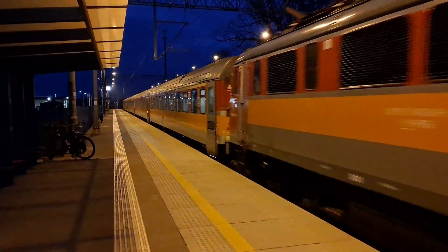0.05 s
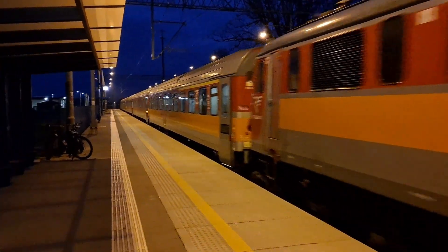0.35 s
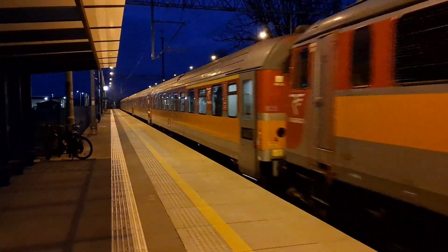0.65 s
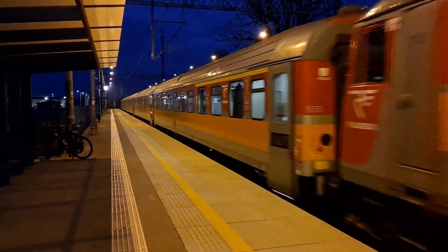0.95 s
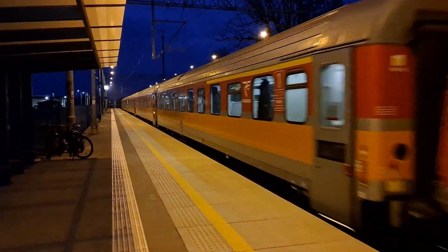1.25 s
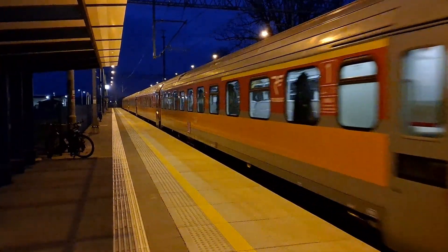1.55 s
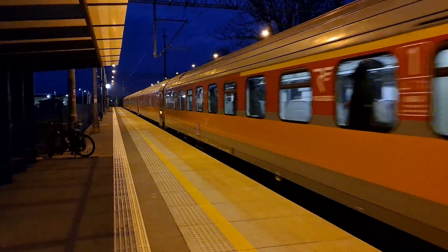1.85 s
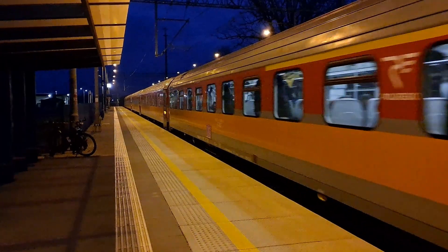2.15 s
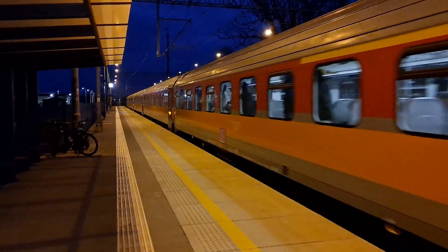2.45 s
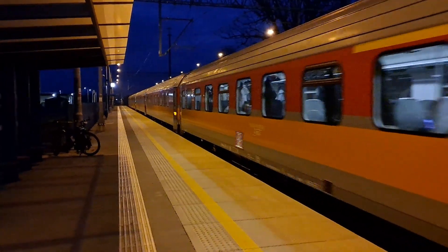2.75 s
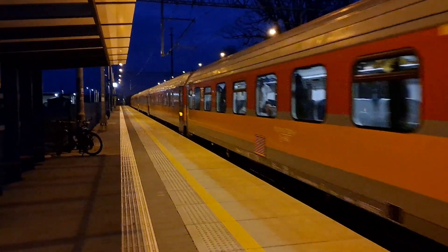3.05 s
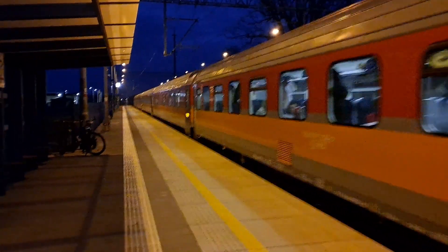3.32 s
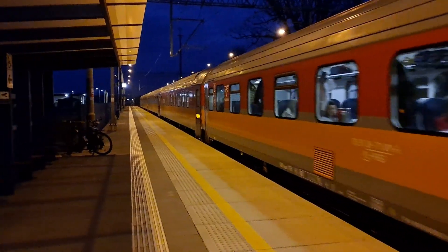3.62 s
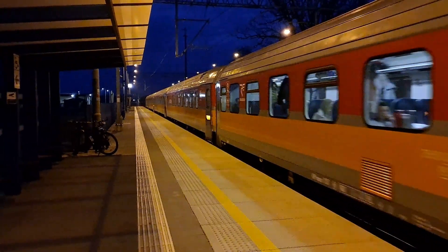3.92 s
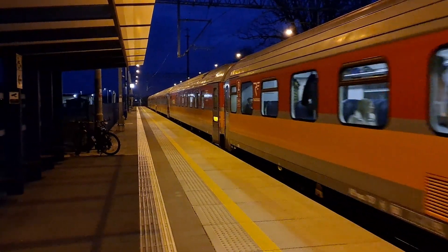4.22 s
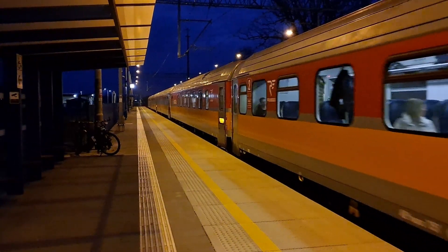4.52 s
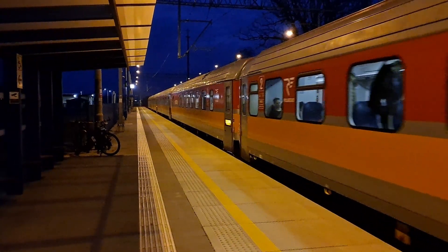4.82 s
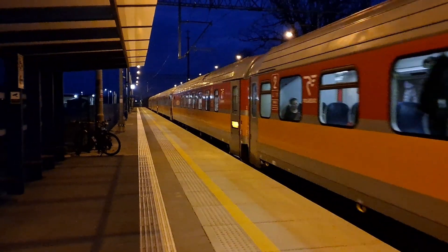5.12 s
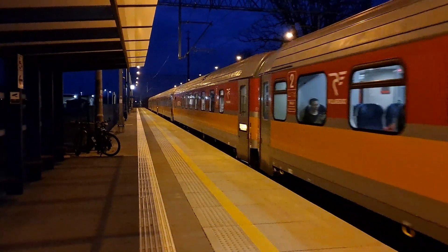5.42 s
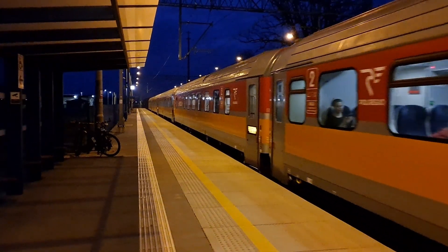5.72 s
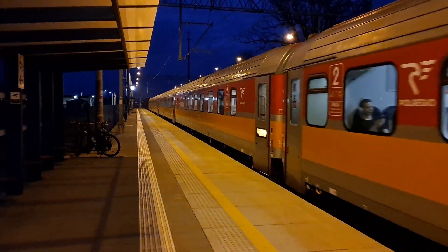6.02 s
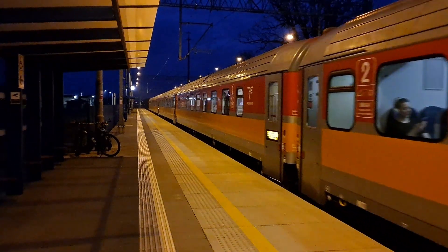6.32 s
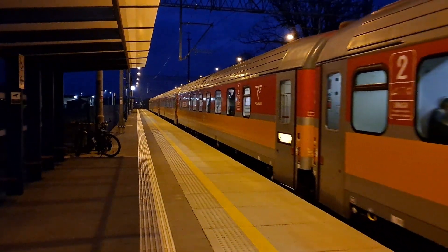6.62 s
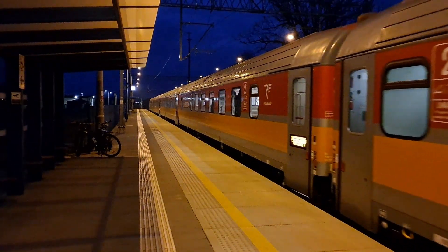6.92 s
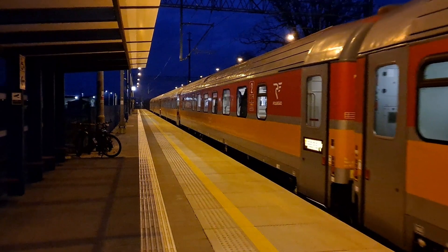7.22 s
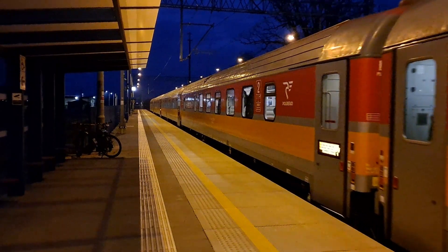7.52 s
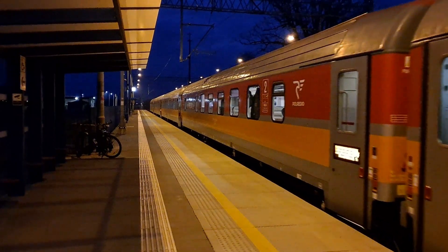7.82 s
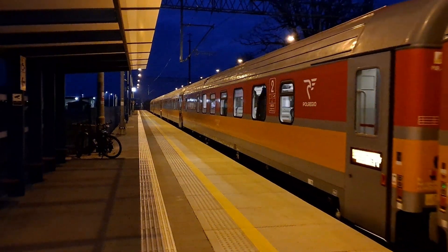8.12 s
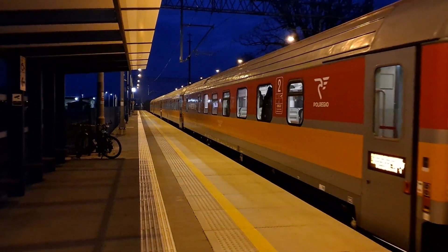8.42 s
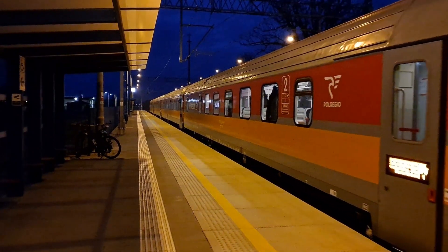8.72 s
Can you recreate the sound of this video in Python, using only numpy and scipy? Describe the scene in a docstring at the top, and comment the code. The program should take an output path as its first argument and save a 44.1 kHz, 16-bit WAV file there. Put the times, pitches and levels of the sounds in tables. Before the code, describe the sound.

An electric passenger train slows along a station platform, heard in stereo from a few metres away. The locomotive's hum and heavy rumble recede in the first seconds, while a loud, piercing brake squeal swells and dips slightly in pitch. Brief wheel scuffs and squeaks dot the coaches' softer rolling. A thinner whine joins, and the squeal pulses, then dies away near the end.

```python
"""Train braking at a platform

A passenger train slows a few metres away. The electric locomotive hums and recedes; the coaches
rumble after it. Their brake discs squeal near 4.7 kHz by stick-slip, sink in pitch as they pass
(Doppler) and pulse as the pads bite. Wheels scuff and ping, the running gear squeaks, a thinner
whine joins from a second brake, and the squeal dies away as the train loses speed."""
import sys
import numpy as np
from scipy import signal
from scipy.fft import rfft, irfft, next_fast_len
from scipy.io import wavfile
from scipy.ndimage import uniform_filter1d, minimum_filter1d

SR = 44100
rng = np.random.default_rng(int(sys.argv[2]) if len(sys.argv) > 2 else 0)


def generate_wav(sig):
    """Save sig (samples, or channels by samples) to the path in sys.argv[1] as 16-bit PCM at SR."""
    pcm = np.round(np.clip(np.atleast_2d(sig).T, -1, 1) * 32767).astype(np.int16)
    wavfile.write(sys.argv[1], SR, pcm)


N = 390716
TIME = np.arange(N) / SR
ENTRY_M_PER_S, BRAKING_M_PER_S2 = 6.3, .5

# stereo balance of sound from the track: f/Hz, left-right/dB
BALANCE_DB = [(30, 2.7), (300, 3.6), (1500, 2.4), (3500, 0.74), (5800, 3), (7500, 10), (9400, 23),
              (11000, 37), (13000, 4), (15500, 5)]


def from_db(db):
    """Decibels to gain."""
    return 10 ** (np.asarray(db) / 20)


def rms_one(x):
    """Scale to unit power."""
    return x / np.sqrt(np.mean(np.abs(x) ** 2) + 1e-20)


def in_time(rows):
    """Each column of a time curve at every sample."""
    times_s, *columns = np.transpose(rows)
    return [np.interp(TIME, times_s, column) for column in columns]


def at_hz(points, hz):
    """Read a spectrum on a log-frequency axis."""
    points_hz, values = np.transpose(points)
    return np.interp(np.log(np.maximum(hz, 1)), np.log(points_hz), values)


def panned(side_db):
    """Left and right gains for a level difference."""
    return from_db(np.array([[.5], [-.5]]) * side_db)


def drift(rate_hz):
    """Low-passed random wander, unit RMS."""
    step = 16
    pole = np.exp(-2 * np.pi * rate_hz * step / SR)
    white = rng.standard_normal(N // step + 2002)
    slow = signal.lfilter([1], [1, -2 * pole, pole * pole], white)[2000:]
    slow = rms_one(slow).astype(np.float32)
    between = np.arange(step, dtype=np.float32) / step
    return (slow[:-1, None] + np.diff(slow)[:, None] * between).ravel()[:N]


def phase_of(hz):
    """Running phase of a steady or moving pitch."""
    return 2 * np.pi * np.cumsum(hz + np.zeros(N)) / SR


def scattered(phase, width_hz, channels=2):
    """Tone over many shifting paths: random fading, independent per channel."""
    angle = (phase % (2 * np.pi)).astype(np.float32)
    cos, sin = np.cos(angle), np.sin(angle)
    return np.array([drift(width_hz) * cos + drift(width_hz) * sin for _ in range(channels)])


def steadied(pair, span_s):
    """Even out each channel's mean power; fast beating remains."""
    size = max(int(span_s * SR), 2)
    power = uniform_filter1d(uniform_filter1d(pair ** 2, size), size // 2)
    return pair / np.sqrt(np.maximum(power, 1e-6))


def swell(centre_s, length_s):
    """Gaussian rise and fall, peak 1."""
    out = np.zeros(N)
    near = slice(*np.searchsorted(TIME, [centre_s - 2 * length_s, centre_s + 2 * length_s]))
    out[near] = np.exp(-2 * ((TIME[near] - centre_s) / length_s) ** 2)
    return out


def track_noise(layers, left_lag_s=0.000363):
    """Stereo noise in layers of (gain, spectral shape); the common part arrives on the right first."""
    # left-right likeness: f/Hz, common share of power
    likeness = [(30, .95), (280, .96), (500, 0.75), (900, 0.26), (1350, 0.51), (2500, 0.22), (6000, 0.38),
                (7500, 0)]
    size = next_fast_len(N)
    hz = np.fft.rfftfreq(size, 1 / SR)
    alike = np.clip(at_hz(likeness, hz), 0, .965)
    sides = panned(at_hz(BALANCE_DB, hz))
    sides = sides / np.sqrt(np.mean(sides ** 2, axis=0))
    lag = np.exp(-2j * np.pi * hz * left_lag_s * np.array([[1], [0]]))
    common = sides * np.sqrt(alike) * lag
    own = sides * np.sqrt(1 - alike)
    out = 0
    for gain, colour in layers:
        white = rfft(rng.standard_normal((3, size), dtype=np.float32))
        spectrum = (common * white[2] + own * white[:2]) * from_db(at_hz(colour, hz))
        out = out + gain * rms_one(irfft(spectrum.astype(np.complex64), size)[:, :N])
    return out


def rolling():
    """Wheels on rail shake the track bed, bogies and bodies; the brake pads hiss."""
    # rolling trends: t/s, deep thrum/dB, rumble/dB, bogie and body drone/dB, wheel-rail roar/dB
    rolling_trends = [(0, -39, -29, -29, -28), (.3, -36, -28, -28, -29), (.65, -45, -36, -30, -31.5),
                      (1.2, -46.5, -33, -28, -32.5), (2.05, -48.5, -37, -34, -38),
                      (2.9, -54, -39, -41, -44.5), (4.4, -58, -41.5, -48, -46.5),
                      (5.7, -61, -39, -44, -45.5), (6.8, -54, -37.5, -38.5, -42.5),
                      (7.7, -53, -38, -41.5, -43.5), (8.25, -48, -40, -41, -43),
                      (8.6, -44, -34, -40.5, -43.5), (8.86, -44, -38, -44, -43.5)]
    # pad hiss trend: t/s, level/dB
    hiss_trend = [(0, -37), (.3, -38.3), (.65, -43), (2.2, -41), (3.9, -42.5), (5.4, -47), (6.2, -45.5),
                  (7.75, -46), (8.86, -53)]
    # spectral shapes: f/Hz, relative density/dB
    thrum_colour = [(16, -36.5), (27, -9.5), (34, 5), (43, -1.5), (55, 0.5), (66, 0), (85, -12.5),
                    (200, -47)]
    rumble_colour = [(25, -35.5), (46, -16), (68, -2.5), (98, -0.5), (125, -4), (155, -7.5), (220, -17),
                     (500, -50.5)]
    drone_colour = [(90, -25), (165, -5.5), (200, 4), (260, -1.5), (330, -5), (430, -9), (600, -30.5),
                    (1500, -54)]
    roar_colour = [(250, -5), (480, 2), (780, 3), (1300, -2), (1750, 0.5), (2500, 0), (3300, -4),
                   (4300, -4.5), (6000, -14.5), (10000, -40)]
    hiss_colour = [(2000, -18), (3200, 2), (3600, 1.5), (3900, 8), (4500, 15), (5400, 4.5), (6400, 1.5),
                   (7600, 1), (8300, 3.5), (9700, -0.5), (10800, -15.5), (12800, -9), (15500, -10)]
    thrum_db, rumble_db, drone_db, roar_db = in_time(rolling_trends)
    hiss_db, = in_time(hiss_trend)
    return track_noise([(from_db(thrum_db + 4.0), thrum_colour),
                        (from_db(rumble_db - 0.87), rumble_colour),
                        (from_db(drone_db - 0.14), drone_colour),
                        (from_db(roar_db + 3.0), roar_colour),
                        (from_db(hiss_db + 8.0), hiss_colour)])


def locomotive():
    """Blower tones and gear noise, fading with distance."""
    # receding hum: t/s, level/dB
    recession = [(0, -28.5), (.5, -36.5), (.9, -32), (1.3, -38), (2, -43), (3, -51), (4.5, -55.5),
                 (8.86, -64)]
    # blowers and running gear: f/Hz, width/Hz, relative level/dB
    blowers = [(99.2, 9.2, -5.5), (130, 14, -2.5), (245.2, 8.8, -0.5), (320, 20, -7), (491, 5, -11.5),
               (871, 80, -12)]
    level_db, = in_time(recession)
    hum = sum(from_db(db) * scattered(phase_of(hz), width_hz, channels=1)
              for hz, width_hz, db in blowers)
    return from_db(level_db) * hum * panned(2.4)


def wheel_scuffs():
    """Short rasps set a wheel ringing; higher modes are damped more."""
    # scuffs: t/s, length/s, rasp/dB, ring/dB
    scuffs = [(3.145, 0.063, -36, -43), (3.76, 0.052, -37, -46), (4.193, .08, -52, -51),
              (4.43, 0.05, -38, -36), (4.80, 0.054, -41, -48), (5.2, 0.066, -42, -37.5),
              (5.606, .05, -44, -52), (6.08, 0.067, -55, -41), (7.40, 0.14, -50, -48),
              (7.785, 0.075, -44, -50)]
    # wheel resonances: f/Hz, relative level/dB
    wheel_modes = [(2015, -10.5), (2715, -1), (6730, -11), (7290, -14)]
    # rasp spectrum: f/Hz, relative density/dB
    rasp_colour = [(900, -24), (2200, -1.5), (4500, -4), (8000, -0.5), (15000, -19.5)]
    rasp_gain = sum(from_db(db) * swell(s, length_s) for s, length_s, db, _ in scuffs)
    ring_gain = sum(from_db(db) * swell(s, length_s) for s, length_s, _, db in scuffs)
    ring = 0
    for hz, db in wheel_modes:
        mode = steadied(scattered(phase_of(hz), width_hz=0.0097 * hz), span_s=.1)
        ring = ring + from_db(db) * mode * panned(at_hz(BALANCE_DB, hz))
    return track_noise([(rasp_gain, rasp_colour)]) + ring_gain * ring


def gear_squeaks():
    """Brief rubbing tones from the running gear, one at a time, each on its own pitch."""
    # squeaks: t/s, length/s, f/Hz, level/dB
    squeaks = [(2.83, 0.044, 5150, -26), (3.31, 0.036, 8260, -40), (4.325, .06, 3550, -43.5),
               (4.518, .05, 3570, -44), (4.78, 0.06, 3610, -40), (5.58, 0.079, 3600, -46),
               (6.83, 0.073, 8250, -49), (7.332, .04, 7600, -47), (8.2, 0.097, 8270, -46.5)]
    times_s, _, pitches_hz, _ = np.transpose(squeaks)
    nearest = np.searchsorted((times_s[:-1] + times_s[1:]) / 2, TIME)
    tone = steadied(scattered(phase_of(pitches_hz[nearest]), width_hz=60), span_s=.07)
    gain = sum(from_db(db) * swell(s, length_s) for s, length_s, _, db in squeaks)
    return gain * tone * panned(at_hz(BALANCE_DB, pitches_hz))[:, nearest]


def pad_beat(rate_hz=2.285, crest_s=6.47):
    """Steady bite and ease of the pads, -1 to 1."""
    return np.cos(2 * np.pi * rate_hz * (TIME - crest_s))


def thin_whine(pitch_hz=4411, onset_s=5.55, beat_depth_db=4.5):
    """A second brake sings a little lower, swelling with the beat of the pads."""
    # whine trend: t/s, level/dB
    trend = [(5.6, -45), (6.25, -40.5), (6.85, -36.5), (7.1, -53), (7.4, -51), (7.78, -40.5), (8.15, -54),
             (8.86, -68)]
    trend_db, = in_time(trend)
    fade_in = np.clip((TIME - onset_s) / 0.28, 0, 1)
    gain = fade_in * from_db(trend_db + beat_depth_db * pad_beat() + 7.0)
    tone = scattered(phase_of(pitch_hz + 5 * drift(9.1)), width_hz=22)
    return gain * steadied(tone, span_s=.18) * panned(1.2)


def train_speed():
    """Speed in m/s under even braking."""
    return ENTRY_M_PER_S - BRAKING_M_PER_S2 * TIME


def disc_pitch(rest_hz=4733, pass_s=2.84, distance_m=4.3, sound_m_per_s=343):
    """Doppler shift: sharp on approach, flat once past, back towards rest pitch as the train slows."""
    speed = train_speed()
    travelled_m = np.cumsum(speed) / SR
    ahead_m = np.interp(pass_s, TIME, travelled_m) - travelled_m
    return rest_hz * (1 + speed / sound_m_per_s * ahead_m / np.hypot(ahead_m, distance_m))


def disc_partial(near_phase, order, fade_hz, skirt_hz, skirt_db, far_db, direct_db, span_s):
    """One partial of all discs beating together; uneven friction adds a noise skirt."""
    # discs further along the train: f/Hz, relative level/dB
    far_discs = [(4650, -14.5), (4690, -8.5), (4718, -6), (4742, -9), (4775, -12)]
    phase = order * near_phase
    tone = scattered(phase, fade_hz)
    tone += from_db(direct_db) * np.cos(phase)  # the direct path does not fade
    for hz, level_db in far_discs:
        tone += from_db(level_db + far_db) * scattered(order * phase_of(hz), fade_hz)
    roughness_db = 10 * (train_speed() / ENTRY_M_PER_S - 0.76)  # a faster disc rubs more roughly
    tone += from_db(skirt_db + roughness_db) * scattered(phase, skirt_hz)
    return steadied(tone, span_s)


def squeal_levels(beat_growth_db_per_s=0.39, third_fade_db_per_s=0.85):
    """Three partial levels in dB: trend, pad beat deepening as the train slows, and harder grabs."""
    # squeal trend: t/s, level/dB, overtone offset/dB
    trend = [(0, -22.5, -26), (.55, -16.5, -23.5), (1.3, -15, -22), (2.4, -12, -23), (3.1, -13.5, -19.5),
             (3.8, -16.5, -16.5), (4.4, -17.5, -19), (5.2, -19, -20.5), (5.6, -21.5, -20),
             (6.1, -19, -23.5), (6.55, -17.5, -21.5), (6.95, -19, -27.5), (7.8, -21, -23),
             (8.05, -26.5, -33), (8.27, -27.5, -34), (8.5, -36.5, -34), (8.75, -35.5, -34),
             (8.86, -57, -34)]
    # a pad grabs harder: t/s, length/s, squeal rise/dB, extra rise of second partial/dB
    grabs = [(1.56, .08, 3.5, -5), (2.73, 0.052, 2.5, 5), (3.36, .09, 3, -2.5), (4.77, .08, 0, 8),
             (5.366, 0.091, 4.5, -1), (6.282, 0.073, 5, 0.5), (7.45, 0.13, 3, 0.5), (7.747, 0.064, 1.5, 6)]
    trend_db, offset_db = in_time(trend)
    beat_db = (beat_growth_db_per_s * TIME - 0.38) * pad_beat()
    held_db = trend_db + sum(db * swell(s, length_s) for s, length_s, db, _ in grabs)
    bright_db = sum(db * swell(s, length_s) for s, length_s, _, db in grabs)
    overtone_db = held_db + 0.92 * beat_db + offset_db
    first_db = held_db + beat_db - 1.2
    second_db = overtone_db + bright_db - 4.5
    third_db = overtone_db + .2 * bright_db - 7 - third_fade_db_per_s * TIME
    return first_db, second_db, third_db


def pad_grind(near_phase, squeal_db, fade_db_per_s=1.24):
    """Pads grind damped disc modes into noise that follows the squeal, catches unevenly and weakens."""
    # disc modes: ratio to squeal pitch, width/Hz, relative level/dB
    modes = [(.76, 69, -31.5), (0.934, 170, -20), (.998, 84.3, -8.5), (1.09, 85, -22), (1.265, 59.7, -36),
             (1.93, 259, -32.5)]
    trend_db = uniform_filter1d(squeal_db, int(.7 * SR)) + 2.7 - fade_db_per_s * TIME
    catch_db = 2.7 * drift(8.7)
    grind = sum(from_db(db) * scattered(near_phase * ratio, width_hz) for ratio, width_hz, db in modes)
    return from_db(trend_db + catch_db) * grind * panned(1.8)


def brake_squeal():
    """Stick-slip of pads on discs: a piercing fundamental and two overtones in grinding noise."""
    # position of the fundamental: t/s, left-right/dB
    position = [(0, 3), (2, 4.5), (3.3, 5), (3.7, 2), (4.2, 4), (5.3, 5.5), (5.7, -3), (6.5, 3),
                (7.1, -0.5), (8, 1.5)]
    side_db, = in_time(position)
    first_db, second_db, third_db = squeal_levels()
    near_phase = phase_of(disc_pitch() + 2.967 * drift(8.6))
    first = disc_partial(near_phase, order=1, fade_hz=8.74, skirt_hz=60, skirt_db=-8.5,
                         far_db=0.04, direct_db=-3.0, span_s=0.1)
    second = disc_partial(near_phase, order=2, fade_hz=10.3, skirt_hz=150, skirt_db=-1.3,
                          far_db=0.5, direct_db=-2.5, span_s=0.19)
    third = disc_partial(near_phase, order=3, fade_hz=18, skirt_hz=380, skirt_db=5.5,
                         far_db=-4.5, direct_db=-3.0, span_s=.18)
    biting = np.clip((8.45 - TIME) / .25, 0, 1)  # the gentle last rubbing has no overtones
    return (from_db(first_db) * first * panned(side_db)
            + biting * from_db(second_db) * second * panned(22.1)
            + biting * from_db(third_db) * third * panned(4)
            + pad_grind(near_phase, first_db))


def scene():
    """The train as heard from the platform."""
    return brake_squeal() + thin_whine() + locomotive() + rolling() + wheel_scuffs() + gear_squeaks()


def record(dry):
    """Peak limiter, then a steep low-pass."""
    ceiling, cutoff_hz = .98, 15450
    size = SR // 200  # 5 ms
    allowed_gain = ceiling / np.maximum(np.abs(dry).max(axis=0), ceiling)
    limited = dry * uniform_filter1d(minimum_filter1d(allowed_gain, 2 * size), size)
    return signal.sosfilt(signal.ellip(12, .1, 90, cutoff_hz, fs=SR, output="sos"), limited)


dry = scene()
out = record(dry)
generate_wav(out)
```